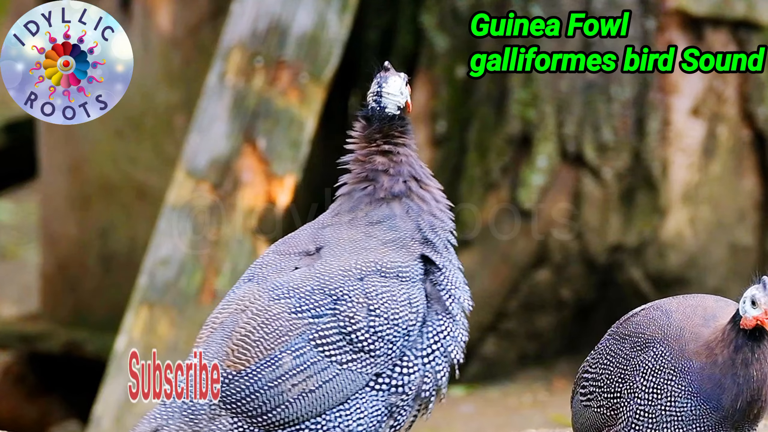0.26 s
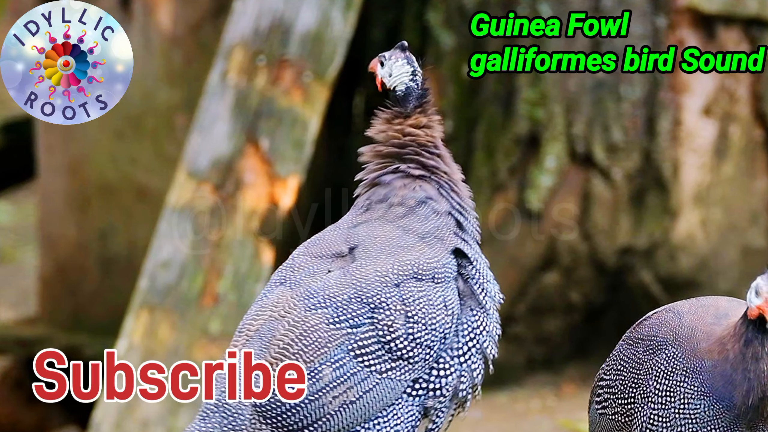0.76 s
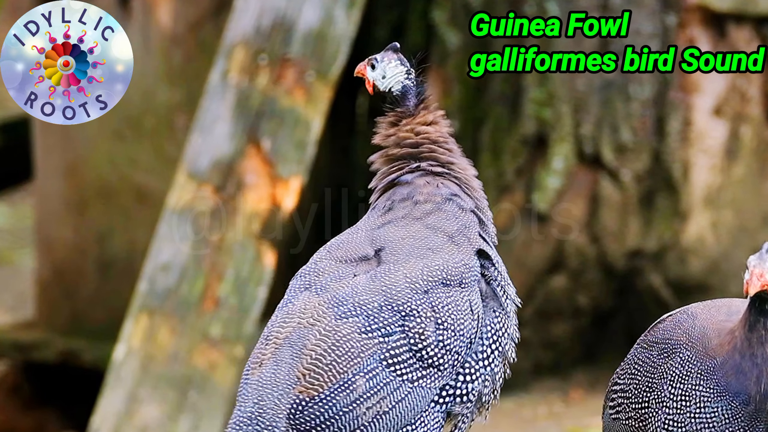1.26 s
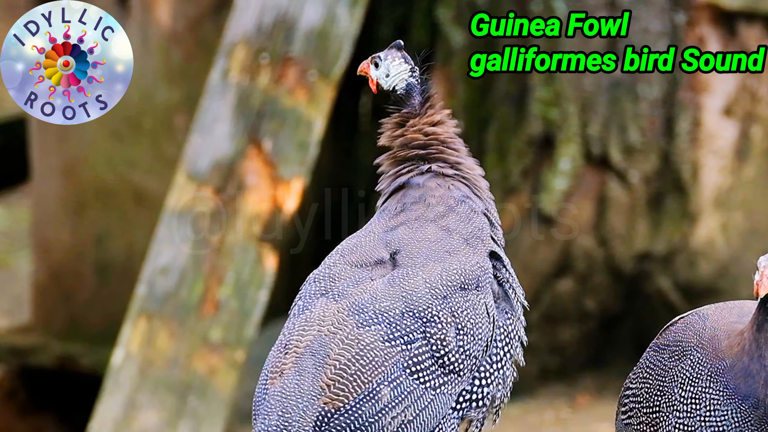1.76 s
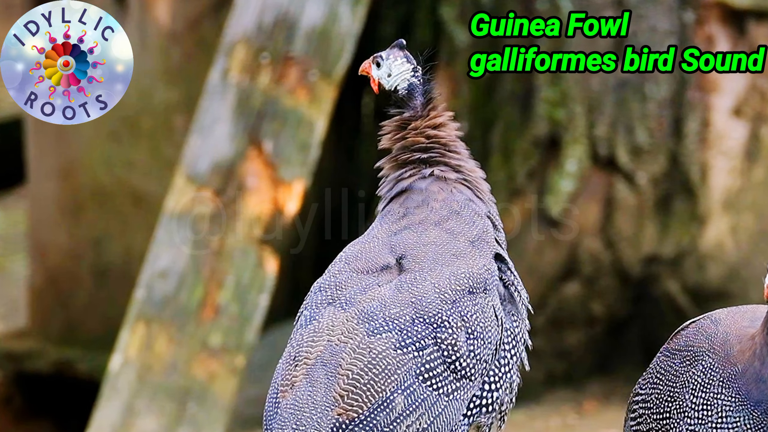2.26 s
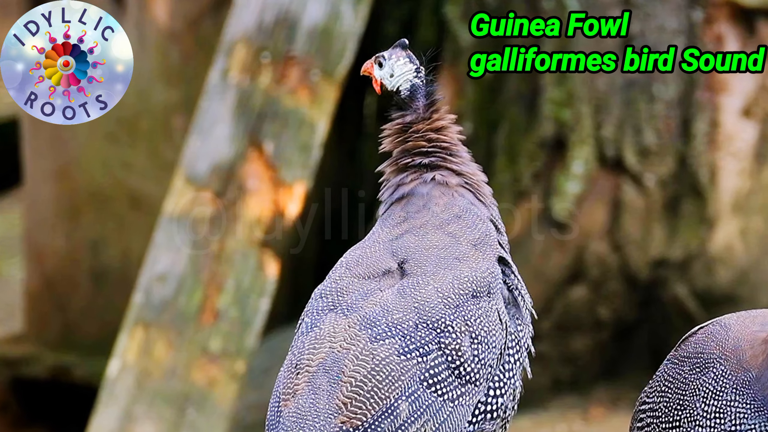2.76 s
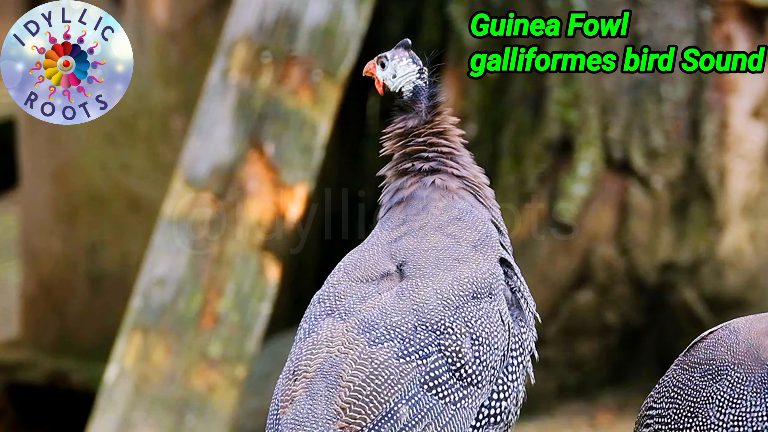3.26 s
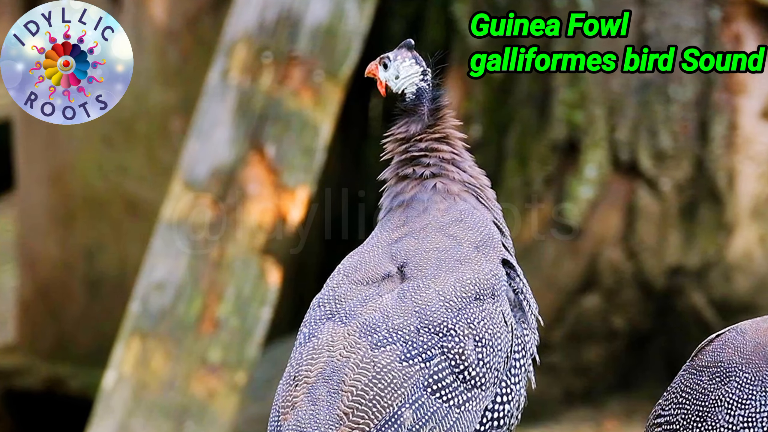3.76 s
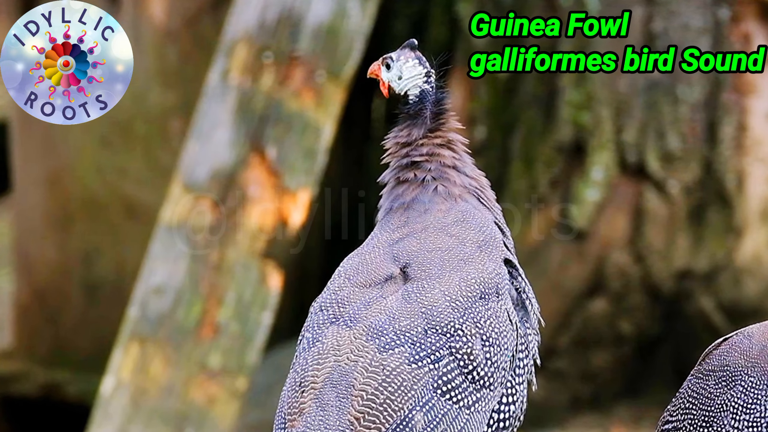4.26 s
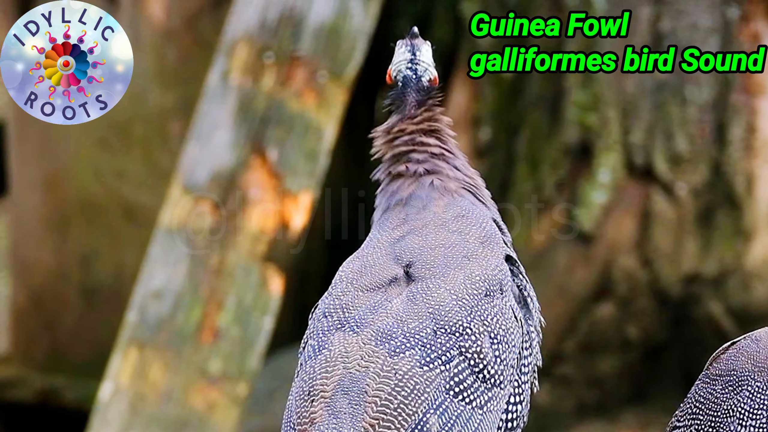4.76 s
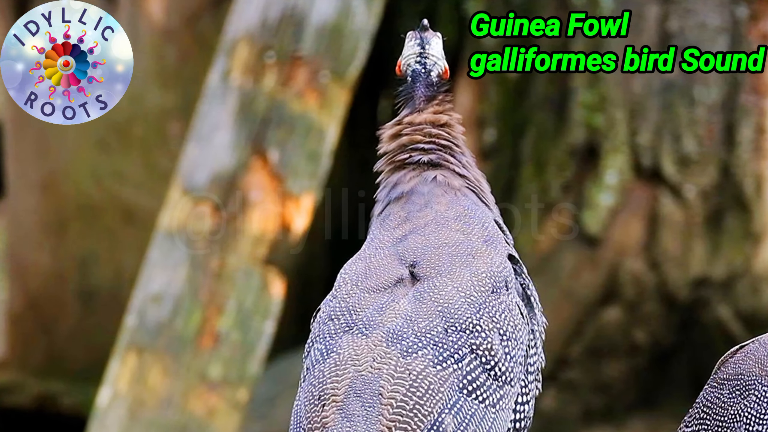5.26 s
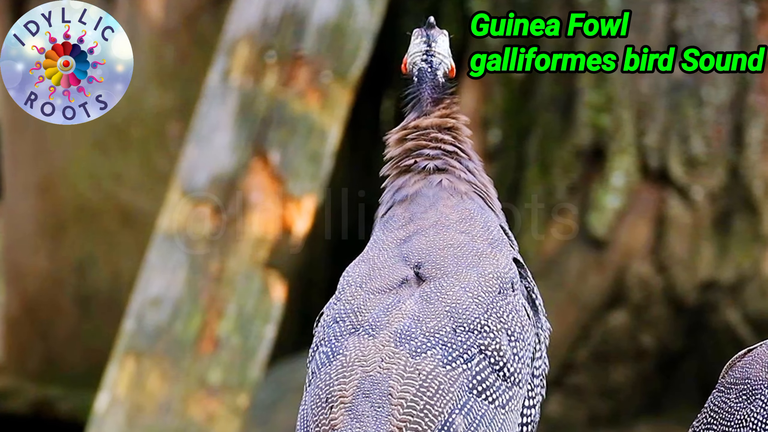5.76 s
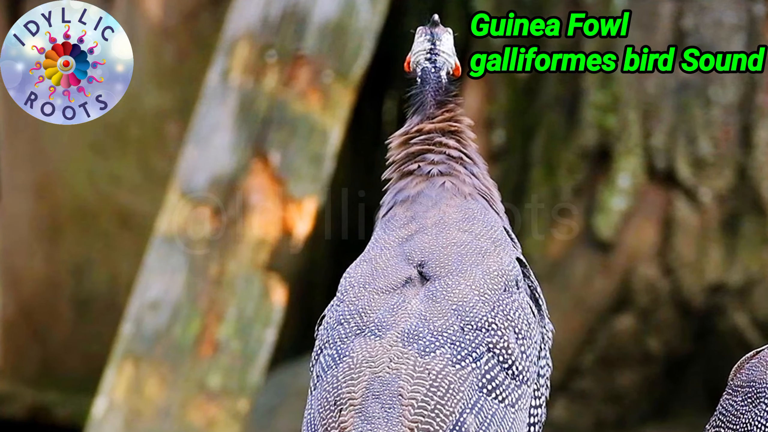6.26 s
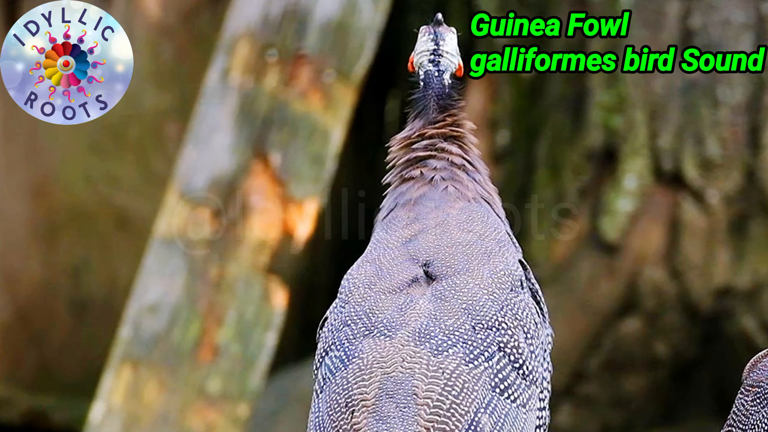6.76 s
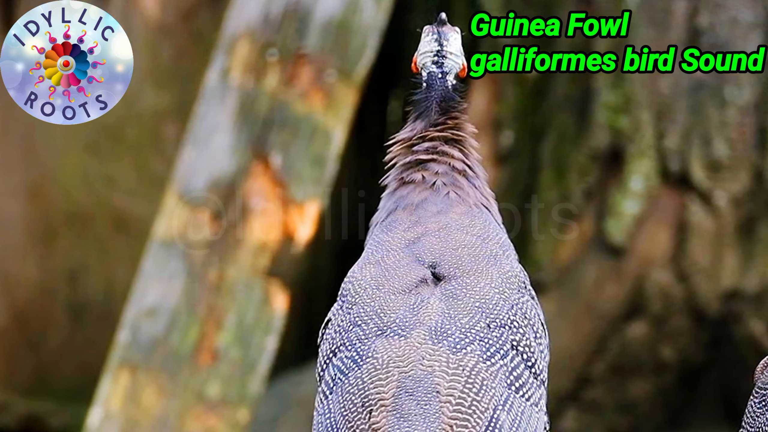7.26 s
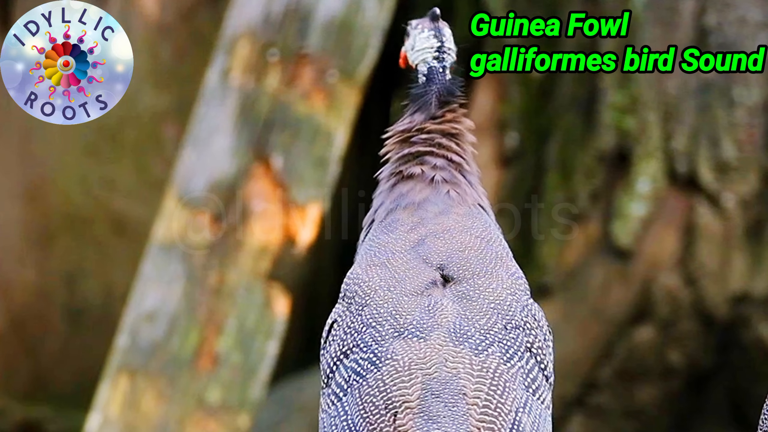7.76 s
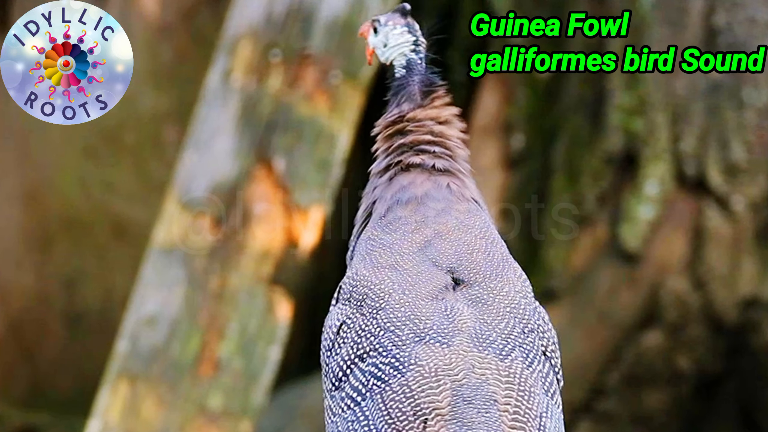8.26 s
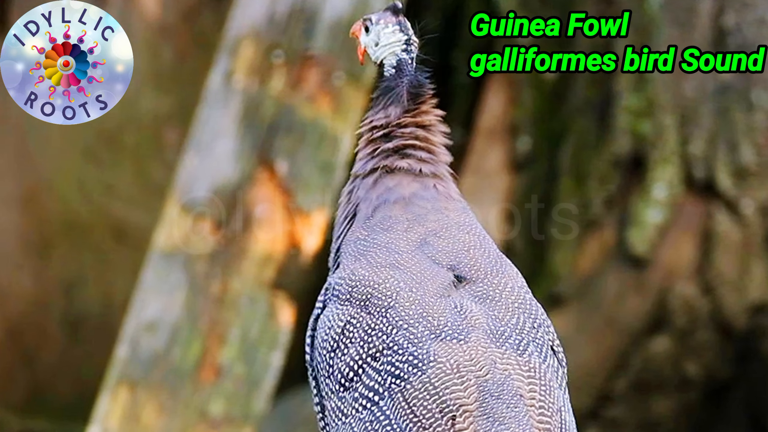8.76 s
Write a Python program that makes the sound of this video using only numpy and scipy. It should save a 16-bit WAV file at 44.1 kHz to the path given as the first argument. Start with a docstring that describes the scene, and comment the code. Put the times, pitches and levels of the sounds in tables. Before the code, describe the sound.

Close guineafowl alarm calls hammer steadily, hoarse and metallic, switching to a second bird midway, later overlapped by drawn-out rattling buzzes and yelps outdoors.

```python
"""Guineafowl alarm in a yard

One near bird gives harsh notes; after a cut, a second, joined by a shrill one, long rattles and squeaks.
In each note a syrinx whistle is shaken by a slower membrane and breaks into a rasp that rings the throat.
A far flock (buzzing voices merged) is louder in the second scene; small birds peep (falling sines).
Feet scuff (band-passed noise), still air hisses (coloured noise), and the yard echoes the near birds."""
import sys
import numpy as np
from scipy import signal
from scipy.fft import rfft, irfft
from scipy.io import wavfile
from scipy.ndimage import uniform_filter1d, minimum_filter1d, map_coordinates

SR = 44100
rng = np.random.default_rng(int(sys.argv[2]) if len(sys.argv) > 2 else 0)


def master(y):
    """Save y as 16-bit WAV."""
    cut = np.clip(np.atleast_2d(y).T, -1, 1)
    pcm = np.round(cut * 32767)  # scale
    wavfile.write(sys.argv[1], SR, pcm.astype(np.int16))


N = 396900
T = np.arange(N) / SR
SCENE_CUT_S, CUT_FADE_S = 3.7, 0.0083  # second scene: louder flock, added rumble
SHRILL_LEAD_DB = -4  # overtone lead-in of the shrill bird

# throat resonances of the second bird: f/Hz, width/Hz, relative level/dB
SECOND_THROAT_MODES = [(1172, 200, -3.5), (1720, 440, -0.5), (2004, 154, 8), (2430, 232, 1.5),
                       (3230, 590, -1.5), (3932, 31, 9), (4500, 273, -0.5), (5180, 100, 4.5),
                       (5170, 160, 0), (6620, 990, -6.5)]
# treble peaks of the second and shrill birds: f/Hz, width/Hz, relative level/dB
SECOND_TREBLE_PEAKS = [(8590, 300, -0.6), (10410, 410, -0.29), (11570, 310, 0.7), (12940, 670, -2.1)]


def undb(db):
    """Decibels to gain."""
    return 10 ** (np.asarray(db) / 20)


def unit(x):
    """Scale to rms 1."""
    return x / np.sqrt(np.mean(x ** 2) + 1e-18)


def ramp(x):
    """Smooth step from 0 to 1 as x goes from 0 to 1."""
    return np.sin(np.pi / 2 * np.clip(x, 0, 1)) ** 2


def bell(x, width):
    """Smooth hump, 1 at x = 0."""
    return np.exp(-(x / width) ** 2)


def curves(table, at):
    """Each column of a table, joined by straight lines."""
    knots, *columns = np.transpose(table)
    return [np.interp(at, knots, column) for column in columns]


def add(track, start_s, sound):
    """Mix a sound into a track."""
    i = max(int(start_s * SR), 0)
    track[i:i + len(sound)] += sound[:max(N - i, 0)]


def noise(n):
    """Fresh white noise."""
    return rng.spawn(1)[0].standard_normal(n)


def wobble(n, rate_hz):
    """Random values joined by lines, rate_hz a second."""
    return np.interp(np.arange(n) * rate_hz / SR, np.arange(n), noise(n))


def colour(x, points):
    """Shape a spectrum by (f/Hz, level/dB) points, joined over log frequency."""
    hz, db = np.transpose(points)
    bins_hz = np.maximum(np.fft.rfftfreq(len(x), 1 / SR), 1)
    gain = undb(np.interp(np.log(bins_hz), np.log(hz), db))
    return irfft(rfft(x) * gain, len(x))


def steep(x, low_hz, high_hz):
    """Band-pass with steep edges."""
    band = [low_hz, min(high_hz, SR / 2 - 1000)]
    return signal.sosfilt(signal.butter(4, band, "band", fs=SR, output="sos"), x)


def saturate(x, drive=0.39):
    """The airflow limits the swing, so the rasp is dense and even."""
    return unit(np.tanh(drive * x))


def ring(x, modes, low_hz, high_hz):
    """Parallel resonances of alternating sign, band-limited, saturated and band-limited more widely."""
    y = 0
    for k, (hz, width_hz, db) in enumerate(modes):
        mode = signal.lfilter(*signal.iirpeak(hz, hz / width_hz, SR), x)
        y = y + (-1) ** k * undb(db) * mode
    dense = saturate(unit(steep(y, low_hz, high_hz)))
    return unit(steep(dense, low_hz * 0.68, high_hz * 2.03))


def scatter(x, spread_s):
    """Paths of a few milliseconds smear the slaps and favour some partials over others."""
    t = T[:SR // 50]
    paths = noise(len(t)) * np.exp(-t / spread_s)
    return unit(signal.fftconvolve(x, paths)[:len(x)])


def membrane(n, hz, jitter, puff_gain, scatter_db=4.5, open_share=0.28):
    """Uneven slaps of the syrinx membrane, each with a puff of air; returns its phase and the buzz."""
    cycles = np.cumsum(hz * (1 + jitter * wobble(n, hz))) / SR
    size = undb(scatter_db * wobble(n, hz))
    slaps = np.diff(np.floor(cycles), prepend=0)
    puffs = noise(n) * np.exp(-(cycles % 1) / open_share)
    return 2 * np.pi * cycles, size * (unit(slaps) + puff_gain * unit(puffs))


def air():
    """Still outdoor air as coloured noise; a low, uneven rumble in the second scene, after the cut."""
    # still air: f/Hz, relative level/dB
    air_colour = [(25, -16), (70, -8), (150, 0), (300, -6), (600, -10), (1200, -7), (3000, -14),
                  (9000, -32)]
    # low rumble: f/Hz, relative level/dB
    rumble_colour = [(25, -6), (70, -4), (140, -7), (300, -7), (700, -27)]
    air_db, rumble_db = -57, -60
    gusts_db = 4 * wobble(N, 8)
    rumble = unit(colour(noise(N), rumble_colour)) * undb(rumble_db + gusts_db)
    rumble *= ramp((T - SCENE_CUT_S) / CUT_FADE_S)
    return undb(air_db) * unit(colour(noise(N), air_colour)) + rumble


def stereo_noise():
    """Faint steady coloured noise, opposite in the two channels."""
    # noise spectrum: f/Hz, relative level/dB
    noise_colour = [(35, -51), (60, -19), (348, -15.5), (1400, -5), (1640, -15.5), (1970, -15),
                    (3480, -18.5), (7060, 1.5), (9500, -43), (14000, -39)]
    return undb(-51.5) * unit(colour(noise(N), noise_colour))


def flock(swell_db=5):
    """Many far voices merge: each buzzes at its own pitch and swells and fades on its own."""
    # spectrum of the merged voices: f/Hz, relative level/dB
    flock_colour = [(88, -70), (150, -45), (318, -34), (515, -16), (1010, -28.5), (1110, -16),
                    (1600, -11.5), (1770, -3), (1980, 0), (2230, -13.5), (3270, -11), (4630, -12),
                    (7790, -31.5), (12400, -32.5), (15000, -45)]
    murmur_db, murmur_ends_s, murmur_release_s, murmur_fade_db_per_s = -35.5, 3.5, 1.06, 2
    chatter_db, surge_db, surge_s, surge_width_s = -30, -30.5, 4.034, 0.37
    voices = 0
    for hz in np.linspace(345, 405, num=5):
        _, buzz = membrane(N, hz * (1 + .03 * wobble(N, 14)), jitter=.03, puff_gain=1.0)
        voices = voices + scatter(buzz, spread_s=0.0095) * undb(swell_db * wobble(N, 11))
    # a murmur fades out, then a cut to a second scene, where the flock is louder
    murmur = undb(murmur_db - murmur_fade_db_per_s * T) * ramp((murmur_ends_s - T) / murmur_release_s)
    chatter = undb(chatter_db) + undb(surge_db) * bell(T - surge_s, surge_width_s)
    chatter *= ramp((T - SCENE_CUT_S) / CUT_FADE_S)
    return unit(colour(voices, flock_colour)) * (murmur + chatter)


def note(row, voice, overtones_db, throat, treble_peaks, shake=0.32, swing=0.19, chaos=0.039, flutter_db=7.5,
         sag=0.0424, tone_db=-28, low_noise_db=-50):
    """One note: a whistle with membrane sidebands, hoarse mid-note, clearer at the ends; voice and hiss.

    Voice levels are in dB; treble_at is a share of the note; rough, jitter and air roughen whistle and
    membrane; scoop, rise and droop are shares of pitch; leap is closing over opening pitch."""
    membrane_hz = 382.1  # before bend and jitter
    break_at, break_width, break_rough = .52, 0.11, 0.59  # shares of the note; added roughness
    close_at, close_width, droop_from = 0.75, 0.12, .74  # shares of the note
    catch_lead_s = .0025  # overtones catch this long before the rasp
    variety_db, variety_size = 5.5, 0.01467  # note to note: overtone level, throat stretch (share)

    _, length_s, hz, level_db, close_db = row
    n = int(length_s * SR)
    t, u = T[:n], np.arange(n) / n
    after_lead_s = t - voice["lead_s"]
    onset = ramp(after_lead_s / voice["attack_s"])
    catch = ramp((after_lead_s + catch_lead_s) / voice["attack_s"])
    release = ramp((length_s - t) / voice["release_s"])
    vigour, stretch = noise(2)
    since_s = np.maximum(after_lead_s - voice["attack_s"], 0)
    effort = undb(level_db) * onset * release

    # pitch scoops into the note, leaps where the whistle breaks, droops as the air runs out
    droop = voice["droop"] * np.maximum((u - droop_from) / (1 - droop_from), 0) ** 2
    bend = 1 + voice["scoop"] * (1 - catch) - droop
    broken = ramp(.5 + (u - break_at) / break_width)
    rising = 1 + voice["rise"] * (u - break_at / 2)
    pitch_hz = hz * ((1 - broken) * rising + broken * voice["leap"])
    rough = voice["rough"] + break_rough * bell(u - break_at, break_width)

    # the membrane pulls on the whistle's pitch and chokes it once a cycle
    slap_hz = membrane_hz * bend * (1 + .012 * wobble(n, 90))
    beat, buzz = membrane(n, slap_hz, voice["jitter"], voice["air"], scatter_db=2)
    whistle_hz = pitch_hz * bend * (1 + chaos * rough * wobble(n, 697))
    phase = 2 * np.pi * np.cumsum(whistle_hz) / SR + swing * np.sin(beat)
    upper = sum(undb(db) * np.sin(k * phase) for k, db in enumerate(overtones_db, 2))
    opening = effort * undb(voice["whistle_db"]) * ramp(after_lead_s / voice["build_s"])
    opening *= bell(since_s, voice["whistle_s"])
    closing = undb(close_db) * bell(u - close_at, close_width)
    bright_db = level_db + variety_db * vigour + voice["overtone_db"] + voice["lead_db"] * (1 - catch)
    bright = undb(bright_db) * bell(since_s, voice["overtone_s"])
    whistle = np.sqrt(2) * ((opening + closing) * np.sin(phase) + bright * upper)
    whistle *= 1 + shake * np.cos(beat)
    whistle *= undb(flutter_db * rough * wobble(n, 160))

    # the syrinx drifts between two regimes, each favouring other partials
    regime = .7 * wobble(n, 70)
    one, other = scatter(buzz, spread_s=.0026), scatter(buzz, spread_s=.0026)
    buzz = np.cos(regime) * one + np.sin(regime) * other

    # moving beak: resampling slides every resonance; the treble arches over the note
    size = 1 + variety_size * stretch + sag * (.4 - u)
    slide = [np.cumsum(np.minimum(bend, 1) ** 1.49 * size)]
    gape = undb(-voice["treble_arch_db"] * (u - voice["treble_at"]) ** 2)
    rasp = map_coordinates(ring(buzz, throat, 1155, 6400), slide, order=3)
    hiss = map_coordinates(ring(buzz, treble_peaks, 6360, 14800), slide, order=5)
    hiss = undb(voice["hiss_db"]) * gape * hiss
    dull = colour(rasp, [(3600, 0), (4600, -30)])
    hoarse = undb(voice["rasp_db"]) * dull + undb(voice["treble_db"]) * gape * (rasp - dull)

    # the membrane's own fundamental swells mid-note, over faint low-passed noise that follows the effort
    tone = undb(tone_db) * np.sin(np.pi * u ** 1.15) ** 2 * (np.sin(beat) + .3 * np.sin(2 * beat))
    low_noise = unit(colour(noise(n), [(30, -10), (150, -2), (600, -3), (2000, -44)]))
    body = effort * (hoarse + tone + undb(low_noise_db) * low_noise)
    return whistle * signal.windows.tukey(n, .06) + body, effort * hiss


def bird(notes, *voice, facing_db=0):
    """All the notes of one bird; the hiss is beamed where the beak points."""
    body, hiss = np.zeros((2, N))
    for row in notes:
        low, high = note(row, *voice)
        add(body, row[0], low)
        add(hiss, row[0], high)
    return body + undb(facing_db) * hiss


def first_bird():
    """Near bird: shaken whistle and rasp, its hiss varying as the beak turns."""
    # notes: t/s, length/s, pitch/Hz, level/dB, closing whistle/dB
    first_notes = [(.082, 0.12, 1588, -11.5, -22), (.381, .11, 1583, -11, -14.5),
                   (.687, .11, 1590, -11.5, -24.5), (.961, .11, 1600, -12, -18),
                   (1.364, .1, 1578, -10, -21), (1.76, .1, 1571, -10, -16.5), (2.032, .1, 1570, -10, -36),
                   (2.269, .11, 1628, -12, -23), (2.517, 0.11, 1645, -11, -19),
                   (2.777, .11, 1607, -12, -21), (3.024, .11, 1637, -12.5, -19.5),
                   (3.26, 0.099, 1574, -12.5, -32)]
    # note shape: times/s, levels/dB, shares (see note)
    first_voice = dict(lead_s=.007, attack_s=.005, build_s=0.0067, release_s=.024, lead_db=-19, whistle_db=1.5, whistle_s=0.025, overtone_db=-1, overtone_s=0.0065, rasp_db=1, treble_db=-2, hiss_db=-8.5, treble_at=0.34, treble_arch_db=47, scoop=.13, rise=.0, leap=0.96, droop=.12, rough=0.47, jitter=.054, air=0.87)
    # whistle harmonics 2, 3, 4: level/dB
    first_overtones = [-2, -8.5, -14.5]
    # throat resonances: f/Hz, width/Hz, relative level/dB
    first_throat = [(1597, 217, -2.5), (1930, 153, 2), (2690, 660, -7), (3610, 58, 5), (3950, 104, 0),
                    (4528, 158, 4.5), (5010, 200, 1.5), (5510, 440, -5), (6195, 170, -3), (7250, 390, -8.5)]
    # treble peaks: f/Hz, width/Hz, relative level/dB
    first_treble_peaks = [(8710, 710, -13), (9830, 155, -7), (10600, 260, -6), (11630, 380, -6), (11910, 370, -6.5),
                          (12100, 560, -5), (13150, 2000, -13.5)]
    # beak direction: t/s, hiss gain/dB
    first_facing = [(0, -1.5), (1.8, -1), (3.3, 1.5)]
    facing_db = curves(first_facing, T)[0]
    return bird(first_notes, first_voice, first_overtones, first_throat, first_treble_peaks, facing_db=facing_db)


def yard(x, early_db, late_db, early_t60_s=0.15, late_t60_s=1.0):
    """Quick reflections from nearby wood, then a long dull echo of the yard: decaying noise, convolved."""
    # echo spectrum: f/Hz, gain/dB
    yard_colour = [(200, 8), (1000, 5), (1800, -2.5), (2800, -7), (5000, 1), (6800, 6.5), (8000, -11.5),
                   (15000, -8.5)]
    t = T[:SR]
    build = 1 - np.exp(-t / 0.0014)
    early, late = (unit(noise(SR) * undb(-60 * t / t60_s) * build) for t60_s in (early_t60_s, late_t60_s))
    response = colour(undb(early_db) * early + undb(late_db) * late, yard_colour) / np.sqrt(SR)
    return x + signal.fftconvolve(x, response)[:N]


def chick(waver=0.064):
    """Soft falling peeps of small birds: wavering sine glides."""
    # peeps: t/s, length/s, first pitch/Hz, last pitch/Hz, level/dB
    peep_rows = [(.3, 0.067, 3340, 3250, -37), (0.314, 0.065, 2440, 2260, -32),
                 (3.164, 0.053, 1570, 875, -40), (3.428, 0.052, 1586, 880, -42),
                 (3.549, .055, 1583, 840, -40.5), (3.676, .055, 1580, 865, -39)]
    track = np.zeros(N)
    for start_s, length_s, first_hz, last_hz, db in peep_rows:
        n = int(length_s * SR)
        u = np.arange(n) / n
        hz = first_hz * (last_hz / first_hz) ** u * (1 + waver * wobble(n, 594))
        tone = np.sin(2 * np.pi * np.cumsum(hz) / SR)
        add(track, start_s, undb(db) * tone * np.sin(np.pi * np.sqrt(u)))
    return track


def feet(decay_s=0.012):
    """Dull little scuffs on the ground: short band-passed noise."""
    # scuffs: t/s, f/Hz, level/dB
    scuff_rows = [(1.128, 900, -49), (4.49, 260, -39), (6.504, 480, -44), (6.745, 305, -36),
                  (8.77, 320, -41)]
    track, t = np.zeros(N), T[:SR // 10]
    envelope = t / decay_s * np.exp(1 - t / decay_s)
    for start_s, hz, db in scuff_rows:
        band = signal.butter(2, [hz * 0.47, hz * 1.32], "band", fs=SR, output="sos")
        thud = unit(signal.sosfilt(band, noise(len(t))))
        add(track, start_s, undb(db) * thud * envelope)
    return track


def second_bird():
    """Second bird: shaken whistle and rasp, its hiss varying as the beak turns."""
    # notes: t/s, length/s, pitch/Hz, level/dB, closing whistle/dB
    second_notes = [(3.75, 0.11, 1662, -12, -10.5), (4.02, 0.1, 1635, -12.5, -16),
                    (4.318, 0.11, 1670, -11.5, -10), (4.596, 0.1, 1656, -12.5, -10),
                    (4.829, 0.11, 1680, -12, -8.5), (5.068, 0.11, 1664, -12.5, -15),
                    (5.322, 0.1, 1677, -11.5, -7), (5.57, 0.1, 1680, -12, -9.5),
                    (5.837, 0.11, 1651, -12, -8), (6.073, .11, 1705, -12, -18),
                    (6.366, .11, 1690, -13, -27), (6.624, 0.12, 1700, -9, -24),
                    (6.867, .11, 1688, -10, -19), (7.129, 0.11, 1680, -10, -19),
                    (7.364, .118, 1703, -10.5, -15), (7.638, .11, 1683, -12.5, -8.5),
                    (7.895, 0.1, 1700, -11.5, -9.5), (8.147, .1, 1673, -12, -12.5),
                    (8.406, .11, 1665, -12.5, -12), (8.645, 0.11, 1683, -11.5, -20),
                    (8.912, 0.1, 1688, -11.5, -14)]
    # note shape: times/s, levels/dB, shares (see note)
    second_voice = dict(lead_s=.006, attack_s=.006, build_s=0.023, release_s=0.034, lead_db=-11, whistle_db=3.5, whistle_s=0.031, overtone_db=-1.5, overtone_s=0.025, rasp_db=1.5, treble_db=3.5, hiss_db=-11, treble_at=0.44, treble_arch_db=78, scoop=.04, rise=0.1565, leap=1.11, droop=.14, rough=0.23, jitter=.045, air=0.81)
    # whistle harmonics 2, 3, 4: level/dB
    second_overtones = [0.43, -9, -14]
    # beak direction: t/s, hiss gain/dB
    second_facing = [(4.6, -10), (5.05, -1), (7.1, 0), (8.9, -6.5)]
    return bird(second_notes, second_voice, second_overtones, SECOND_THROAT_MODES, SECOND_TREBLE_PEAKS,
                facing_db=curves(second_facing, T)[0])


def rattle(throb_hz=88, throb_depth=0.17, tone_db=-34, waver=.012, jitter=.018, puff_gain=0.58):
    """Drawn-out calls: a hoarse membrane buzz that throbs unevenly in a narrow throat and sags as it fades."""
    # calls: t/s, length/s, pitch/Hz, level/dB, release/s
    rattle_rows = [(6.04, .14, 371.8, -12.5, 0.049), (6.153, .145, 368.6, -14.5, .045),
                   (6.896, 0.51, 366.7, -10, 0.33), (7.329, 0.28, 369.8, -14.5, 0.16),
                   (7.87, 0.26, 385.5, -20, .05), (8.074, 0.4, 389.3, -18.5, 0.19),
                   (8.36, .25, 384.4, -17.5, 0.078), (8.944, .2, 371.5, -15, 0.069)]
    # throat resonances: f/Hz, width/Hz, relative level/dB
    rattle_throat = [(1150, 320, -10), (1968, 320, 7), (2138, 270, 9.5), (2820, 170, 1), (3000, 700, -5.5),
                     (3906, 170, -3), (4560, 230, -5.5), (5830, 840, -18)]
    attack_s, fade_db_per_s = 0.04, 6.5
    pitch_sag = .05  # share lost as the effort fades
    track = np.zeros(N)
    for start_s, length_s, hz, db, release_s in rattle_rows:
        n = int(length_s * SR)
        t = T[:n]
        effort = ramp(t / attack_s) * ramp((length_s - t) / release_s)
        pitch_hz = hz * (1 - pitch_sag * (1 - effort)) * (1 + waver * wobble(n, 25))
        beat, buzz = membrane(n, pitch_hz, jitter, puff_gain, scatter_db=1.5, open_share=1.2)
        throb_phase = 2 * np.pi * np.cumsum(throb_hz * (1 + .3 * wobble(n, 90))) / SR
        throb = 1 + throb_depth * np.sin(throb_phase)
        voice = unit(ring(buzz, rattle_throat, 900, 7900) * throb + undb(tone_db) * np.sin(beat))
        add(track, start_s, undb(db - fade_db_per_s * t) * effort * voice)
    return track


def squeaks(rasp_db=-8, fall=1.52):
    """Short, hoarse, falling yelps: strong third harmonic at first, then the second swells; rasp on top."""
    # yelps: t/s, length/s, first pitch/Hz, last pitch/Hz, level/dB
    squeak_rows = [(6.418, 0.054, 1124, 1035, -10), (6.794, .06, 1194, 1028, -12.5),
                   (7.516, 0.058, 1045, 872, -28.5), (7.748, 0.043, 1100, 970, -25),
                   (8.839, 0.039, 1143, 977, -15)]
    harmonics_db = (-15, 0, -8, -20, -17, -23)  # mid-yelp
    swell_db = (10, 20, -16, 0, -4, -8)  # change over the yelp
    track = np.zeros(N)
    for start_s, length_s, first_hz, last_hz, db in squeak_rows:
        n = int(length_s * SR)
        u = np.arange(n) / n
        hz = (last_hz + (first_hz - last_hz) * (1 - u) ** fall) * (1 + 0.039 * wobble(n, 660))
        phase = 2 * np.pi * np.cumsum(hz) / SR
        stack = 0
        for k, (level_db, rise_db) in enumerate(zip(harmonics_db, swell_db), 1):
            gain = undb(level_db + rise_db * (u - .5) + 2.5 * wobble(n, 130))
            stack = stack + gain * np.sin(k * phase)
        rasp = ring(noise(n) * (1 + np.cos(phase)), SECOND_THROAT_MODES, 1060, 5200)
        voice = unit(stack) + undb(rasp_db) * rasp
        envelope = np.sin(np.pi * u ** 1.12) ** 0.65
        add(track, start_s, undb(db) * unit(voice * envelope))
    return track


def shrill_bird():
    """Shrill bird: the same whistle and rasp in a throat of its own."""
    # notes: t/s, length/s, pitch/Hz, level/dB, closing whistle/dB
    shrill_notes = [(7.207, .11, 1680, -19.5, -41), (7.69, .102, 1733, -20.5, -15.5),
                    (7.985, .1, 1716, -17.5, -23), (8.24, 0.094, 1686, -19, -19),
                    (8.491, .1, 1715, -18, -18.5), (8.882, 0.066, 1792, -21, -6)]
    # note shape: times/s, levels/dB, shares (see note)
    shrill_voice = dict(lead_s=.004, attack_s=0.003, build_s=0.0041, release_s=0.031, lead_db=SHRILL_LEAD_DB, whistle_db=3.5, whistle_s=0.018, overtone_db=-4.5, overtone_s=0.018, rasp_db=2.5, treble_db=3.5, hiss_db=-13, treble_at=0.4, treble_arch_db=53, scoop=0.037, rise=0.015, leap=1.21, droop=0.15, rough=0.27, jitter=0.049, air=0.59)
    # whistle harmonics 2, 3, 4: level/dB
    shrill_overtones = [5.2, 3.7, -13]
    # throat resonances: f/Hz, width/Hz, relative level/dB
    shrill_throat = [(1190, 210, -6.5), (2050, 150, 9.5), (2820, 440, 3), (3570, 650, -4.5), (4320, 320, 2),
                     (4950, 480, 2), (5550, 200, 5), (6400, 2200, -2)]
    return bird(shrill_notes, shrill_voice, shrill_overtones, shrill_throat, SECOND_TREBLE_PEAKS)


def scene():
    """The birds stand straight ahead, so both channels are nearly alike."""
    near = yard(first_bird(), early_db=-7, late_db=-19.5)
    others = second_bird() + shrill_bird() + rattle() + squeaks()
    near += yard(others, early_db=-21, late_db=-28)
    mid = near + flock() + chick() + feet() + air()
    opposite = stereo_noise()
    return np.array([mid + opposite, mid - opposite])


def record(dry):
    """A fast limiter holds the loudest notes down; soft clipping rounds peaks; a low-pass cuts the top."""
    over = np.maximum(np.abs(dry).max(axis=0) / 1.25, 1)
    gain = uniform_filter1d(minimum_filter1d(1 / over, size=220), size=220)
    held = dry * gain
    rounded = held / (1 + (held / 1.03) ** 8) ** (1 / 8)
    top_hz = 15450
    return signal.sosfilt(signal.ellip(10, .2, 70, top_hz, fs=SR, output="sos"), rounded)


dry = scene()
out = record(dry)
master(out)
```